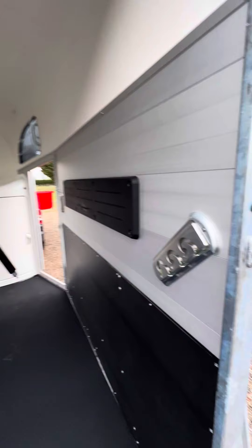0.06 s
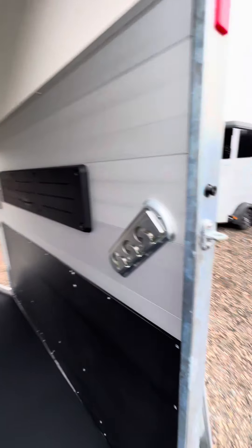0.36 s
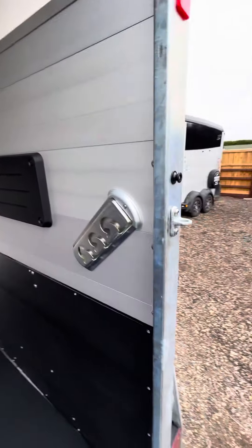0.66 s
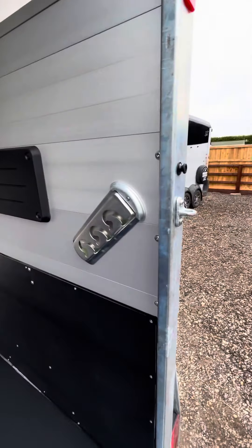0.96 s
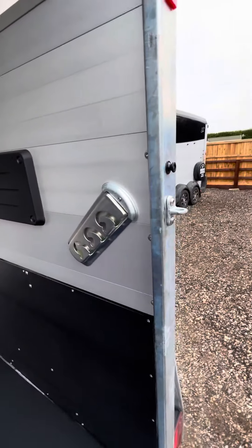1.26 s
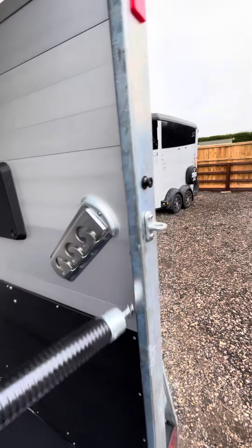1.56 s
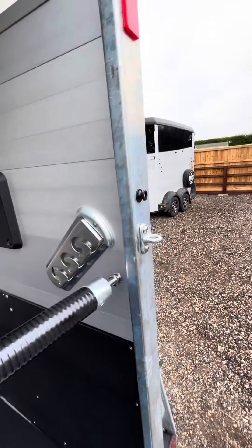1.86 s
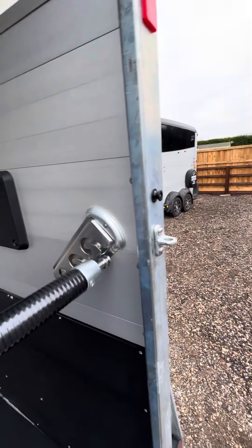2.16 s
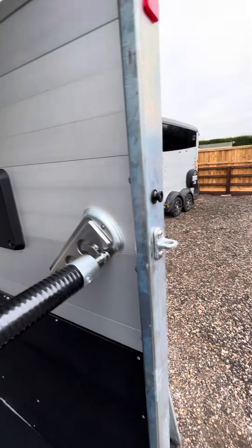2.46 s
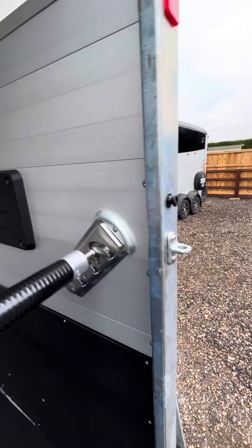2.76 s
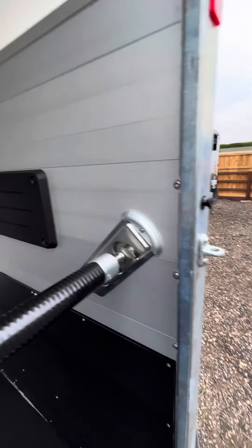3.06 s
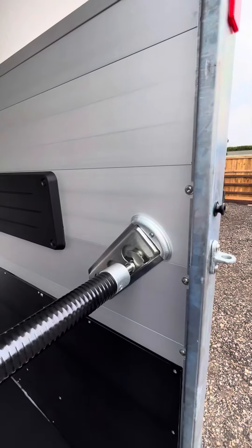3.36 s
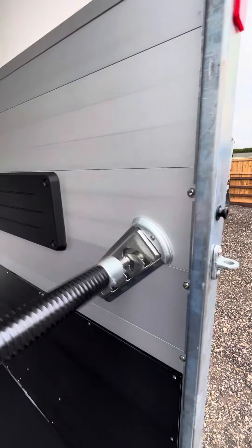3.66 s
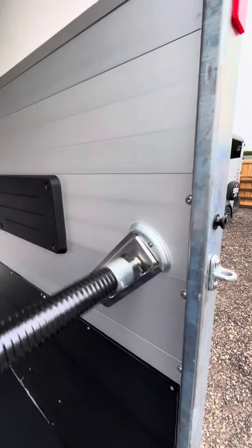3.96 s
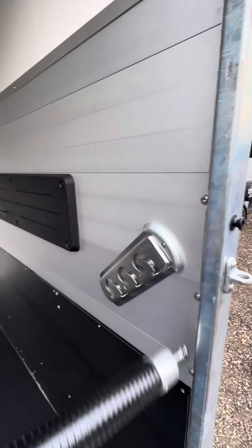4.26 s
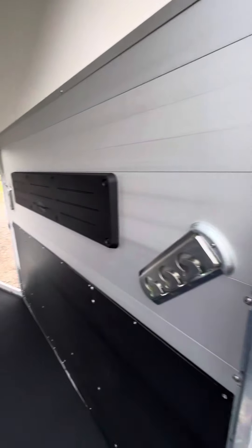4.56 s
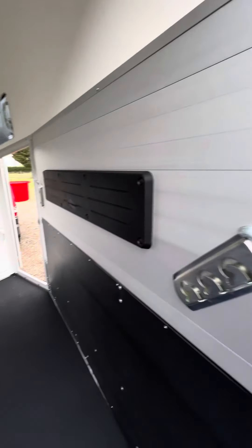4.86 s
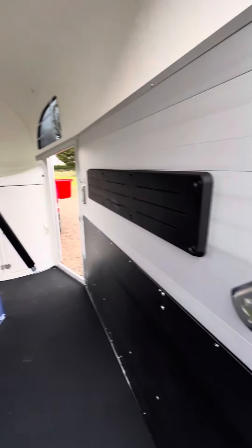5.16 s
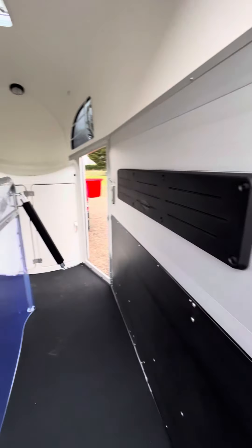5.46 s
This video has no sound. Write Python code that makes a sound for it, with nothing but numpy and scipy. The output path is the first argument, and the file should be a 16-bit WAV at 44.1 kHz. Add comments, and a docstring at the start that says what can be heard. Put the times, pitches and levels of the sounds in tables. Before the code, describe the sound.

Faint rustles, a few soft knocks and small birds chirping sit over a low, steady outdoor drone. Then, close by inside a horse trailer, a bar's steel pin is knocked loudly into a wall bracket. It clanks repeatedly, grates and briefly squeals, each hit ringing the metal and booming in the hollow body while the floor rumbles. The clanks ease off, and one lighter knock comes at the end.

```python
"""In a horse trailer, the steel pin of a padded breech bar is knocked into the slotted wall bracket,
scraped along it and drawn out again. Each impact cracks, rings the bracket's modes, crosses the
aluminium panel as a bending wave and booms in the hollow body. Stick-slip friction makes the pin grate,
groan and squeal; the floor rumbles as weight shifts, amid faint rustles and hisses.
Outside the open ramp are a low steady drone, faint air and small birds."""
import sys
import numpy as np
from scipy import signal
from scipy.fft import rfft, irfft, next_fast_len
from scipy.io import wavfile

SR = 44100
rng = np.random.default_rng(int(sys.argv[2]) if len(sys.argv) > 2 else 0)


def digitize_waveform(pressure):
    """Quantize a signal to 16-bit integers and store it at the path in sys.argv[1].

    Rows of a 2-D input are taken as channels; values are limited to [-1, 1].
    """
    field = np.atleast_2d(pressure).T
    bounded = np.clip(field, -1, 1)
    quanta = np.round(bounded * 32767).astype(np.int16)
    wavfile.write(sys.argv[1], SR, quanta)


N = 242991
TIME = np.arange(N) / SR
BANDS_HZ = 28 * 2 ** (np.arange(28) / 3)   # third-octave centres


def from_db(db):
    """Decibels to amplitude ratio."""
    return 10 ** (np.asarray(db) / 20)

def unit_rms(x):
    """Normalisation to unit power."""
    return x / np.sqrt(np.mean(x ** 2) + 1e-20)

def at_hz(rows, hz, column=1):
    """Interpolation of a table column over log frequency."""
    rows = np.array(rows)
    return np.interp(np.log(hz + 1e-3), np.log(rows[:, 0]), rows[:, column])

def pan(db):
    """A level difference as left and right gains."""
    return from_db(np.array([[db], [-db]]) / 2)

def add(track, start, sound):
    """Superposition of a sound on a track, from a start in seconds."""
    at = int(start * SR)
    track[..., at:at + sound.shape[-1]] += sound[..., :N - at]

def wander(rate):
    """Random modulation: straight lines between `rate` Gaussian values a second."""
    return np.interp(TIME * rate, np.arange(12000), rng.standard_normal(12000))

def resonate(x, hz, width_hz):
    """Resonance: two second-order band-passes in cascade, each of this width."""
    r = np.exp(-np.pi * width_hz / SR)
    b, a = np.array([1, 0, -1]) * (1 - r * r) / 2, [1, -2 * r * np.cos(2 * np.pi * hz / SR), r * r]
    once = signal.lfilter(b, a, x + 1e-18)
    return signal.lfilter(b, a, once + 1e-18)

def swells(rows, attack_s, t60, column=2):
    """Envelopes that rise, hold and decay exponentially, summed in power."""
    power = np.zeros(N)
    for row in rows:
        age = TIME - row[0]
        decay_db = 60 * np.maximum(age - row[1], 0) / t60
        power += (np.clip(age / attack_s, 0, 1) * from_db(row[column] - decay_db)) ** 2
    return np.sqrt(power)

def echoes(x, t60):
    """Diffuse reverberation: convolution with decaying stereo noise."""
    tail = rng.standard_normal((2, SR // 2)) * from_db(-60 * TIME[:SR // 2] / t60)
    return signal.fftconvolve(x[None], tail / np.linalg.norm(tail[0]), axes=1)[:, :N]

def coloured(bands, spectrum, shift_s):
    """Spectral shaping of band noise; a time shift decorrelates it from other uses."""
    mix = sum(float(from_db(at_hz(spectrum, hz))) * noise
              for hz, noise in zip(BANDS_HZ, bands) if hz < 2 * spectrum[-1][0])
    return np.roll(mix, int(shift_s * SR), axis=1)

# The stereo field: (frequency [Hz], left over right [dB], coherence [0-1], left phase lead [rad])
STEREO = [(100, 3, 1, 0.25), (310, 4.5, 0.95, -0.36), (567, 13.5, 0.072, 0.5), (1000, 9, 0.15, 0.03),
          (1896, 1.5, 0.88, -1.43), (4300, 1.5, 0.042, -3), (9040, 0.5, 0.29, -0.8)]
def stereo_gain(hz):
    """Level and phase differences as complex left and right gains."""
    phase = at_hz(STEREO, hz, column=3) * np.array([[0], [1]])
    return pan(at_hz(STEREO, hz)).reshape(2, -1) * np.exp(-1j * phase)

def noise_bands(pan_share, ripple_db, spacing_hz, clusters=()):
    """Partly coherent stereo noise in bands; overlapping resonances ripple its spectrum."""
    size = next_fast_len(N)
    hz = np.arange(size // 2 + 1) * SR / size
    left, other = rfft(rng.standard_normal((2, size)))
    coherence = np.clip(at_hz(STEREO, hz, column=2), 0, .999)
    right = coherence * left + np.sqrt(1 - coherence ** 2) * other
    right *= np.exp(-1j * at_hz(STEREO, hz, column=3))
    ripple = np.interp(hz / spacing_hz, np.arange(len(hz)), rng.standard_normal(len(hz)))
    ripple *= hz / (hz + 900) / (1 + (hz / 9000) ** 2)
    humps_db = sum(db * np.exp(-((hz - centre) / width) ** 2) for centre, width, db in clusters)
    pair = np.array([left, right]) * from_db(ripple_db * ripple + humps_db)
    band_index = np.interp(hz, BANDS_HZ, np.arange(len(BANDS_HZ)))
    bands, overlap_gain = [], np.sqrt(2 / 3)
    for k, centre in enumerate(BANDS_HZ):
        triangle = np.maximum(1 - abs(band_index - k), 0)
        band = unit_rms(irfft(pair * triangle, size)[:, :N])
        bands.append(band * overlap_gain * pan(pan_share * at_hz(STEREO, centre)))
    return bands


# Spectrum of the outdoor air: (frequency [Hz], band level [dB])
AIR_SPECTRUM = [(25, -74.5), (45, -57.5), (75, -56.5), (110, -56), (160, -60.5), (250, -66.5), (450, -64),
                (800, -58.5), (1300, -64.5), (2200, -69), (3500, -74), (5700, -76), (6700, -77.5),
                (8300, -73.5), (10500, -98.5), (15000, -112)]
def air(bands):
    """Stationary broadband noise: the faint air outside."""
    return coloured(bands, AIR_SPECTRUM, shift_s=0)

def drone(hz=72.3, width_hz=16, db=-46.5):
    """Narrowband noise beats within itself: a low, wavering hum from far away."""
    hum = resonate(rng.standard_normal(N + SR), hz, width_hz)[SR:]
    return from_db(db) * unit_rms(hum) * pan(at_hz(STEREO, hz))

# Faint hisses: (time [s], duration [s], centre frequency [Hz], level [dB])
HISSES = [(0.224, 0.065, 8070, -61.5), (0.41, 0.52, 3660, -61.5), (0.477, 0.55, 6000, -64),
          (1.206, 0.22, 8070, -58.5), (4.3, 1.4, 5580, -71), (4.242, 1.14, 8140, -69.5)]
def hiss(width_hz=850):
    """Band-passed white noise swells and fades as soft, narrow hisses."""
    out, white = np.zeros((2, N)), rng.standard_normal((2, N))
    for row in HISSES:
        noise = unit_rms(resonate(white, row[2], width_hz))
        out += swells([row], attack_s=0.035, t60=0.86, column=3) * noise
    return out

# Arched whistles: (time [s], pitch [Hz], glide [share of pitch], level [dB])
BIRD_WHISTLES = [(.34, 6350, .07, -58.5), (1.01, 4800, -0.027, -58.5), (1.155, 6360, 0.02, -49.5),
                 (1.645, 5170, -0.029, -57), (1.82, 5700, -.025, -59)]
# Falling sweeps: (time [s], middle pitch [Hz], level [dB])
BIRD_SWEEPS = [(.135, 4930, -56), (.475, 4950, -57), (1.9, 5200, -62), (2.018, 4970, -66),
               (2.09, 5450, -57)]
def birds(whistle_s=0.105, whistle_arch=0.035, sweep_s=0.053, sweep_glide=-0.56, warble=0.0085):
    """Frequency- and amplitude-modulated tones: birdsong, blurred by echoes from the yard."""
    song = np.zeros(N)
    notes = [(start, whistle_s, hz, glide, whistle_arch, db) for start, hz, glide, db in BIRD_WHISTLES]
    notes += [(start, sweep_s, hz, sweep_glide, 0, db) for start, hz, db in BIRD_SWEEPS]
    for start, length, middle_hz, glide, arch, db in notes:
        progress = np.linspace(0, 1, int(length * SR))
        waver = np.interp(progress, np.linspace(0, 1, 40), rng.standard_normal(40))
        hz = middle_hz * (1 + glide * (progress - .5) - arch * (2 * progress - 1) ** 2 + warble * waver)
        tone = np.sin(2 * np.pi * np.cumsum(hz) / SR)
        add(song, start, from_db(db) * np.sin(np.pi * progress) * tone)
    song *= from_db(3 * wander(120))   # flutter
    return from_db(-5.5) * song + from_db(-8) * echoes(song, t60=0.23)

# Rustles of handling: (time [s], duration [s], level [dB])
HANDLING = [(-.05, 0.14, -52.5), (.2, 0.35, -56.5), (.48, 0.53, -57.5), (1.18, 0.25, -51),
            (4.17, 0.33, -60)]
# Their spectrum: (frequency [Hz], band level [dB])
RUSTLE_SPECTRUM = [(400, -16.5), (1500, -17.5), (2700, -16.5), (3700, -14), (5000, -10.5), (6500, -15),
                   (8200, -2), (10500, -54.5), (15000, -56)]
def rustle(bands):
    """Amplitude-modulated treble noise: faint rustles of handling."""
    return swells(HANDLING, attack_s=0.057, t60=1.2) * coloured(bands, RUSTLE_SPECTRUM, shift_s=1.8)

# Weight shifting on the floor: (time [s], duration [s], level [dB])
FLOOR_LOADS = [(.49, 0.026, -45.5), (.83, 0.18, -38.5), (1.25, 0.13, -35), (2.45, 0.45, -35),
               (3.25, 0.95, -39), (3.68, 0.82, -35.5)]
# The floor's response: (frequency [Hz], band level [dB])
FLOOR_SPECTRUM = [(28, -50), (50, -9), (75, -11), (150, -6), (230, -15.5), (350, -18), (500, -27.5),
                  (1200, -39.5), (3000, -79.5)]
def floor(bands, rest_db=-57):
    """Forced vibration: shifting weight lifts the floor's rumble above its resting level."""
    load = from_db(rest_db) + swells(FLOOR_LOADS, attack_s=0.038, t60=0.87)
    return load * coloured(bands, FLOOR_SPECTRUM, shift_s=2)

# Squeals of the pin:
# (time [s], duration [s], pitch [Hz], glide [share of pitch], roughness [0-1], level [dB])
PIN_SQUEALS = [(2.622, 0.055, 1200, -0.09, 0.45, -37), (2.622, 0.055, 6850, 0.05, 0.97, -41.5),
               (2.623, 0.06, 11500, -0.028, 0.9, -55.5), (2.71, 0.083, 3650, 0.13, 0.9, -43)]
def squeals(edge_s=0.0085, width_share=0.21):
    """Self-excited vibration: binding steel sings a gliding tone that roughness turns to a screech."""
    out = np.zeros((2, N))
    for start, length, hz, glide, rough, db in PIN_SQUEALS:
        t, rate = TIME[:int(length * SR)], width_share * hz
        cycles = np.cumsum(hz * (1 + glide * (t / length - .5))) / SR
        scatter = np.array([unit_rms(wander(rate)) + 1j * unit_rms(wander(rate)) for _ in range(2)])
        amplitude = np.sqrt(2 * (1 - rough ** 2)) + rough * scatter[:, :len(t)]
        tone = (amplitude * np.exp(2j * np.pi * cycles)).real
        fade = np.clip(np.minimum(t, length - t) / edge_s, 0, 1)
        add(out, start, from_db(db) * pan(at_hz(STEREO, hz)) * tone * fade)
    return from_db(-1) * out + from_db(-5) * echoes(out[0], t60=0.24)

# Strokes of the pin along the slot: (time [s], duration [s], grit level [dB], groan level [dB])
STROKES = [(2.617, 0.17, -46, -33.5), (3.026, 0.12, -57, -45.5), (3.547, 0.093, -50.5, -48),
           (3.885, 0.17, -46, -47.5)]
# Resonances of the sliding contact: (frequency before bending [Hz], width [Hz], level [dB])
GROAN_PEAKS = [(597, 50, -5.5), (1170, 100, 0.5), (1437, 50, 1.5), (1900, 280, 4.5), (2600, 200, -2),
               (3100, 150, -4.5), (3700, 470, -2)]
# Spectrum of the grit: (frequency [Hz], band level [dB])
GRIT_SPECTRUM = [(100, -22.5), (350, 1.5), (480, -2.5), (750, -2.5), (1500, -13), (3000, -22.5), (4500, -7),
                 (6000, -18), (7400, -5), (9500, -24), (11500, -18.5), (15500, -52.5)]
def scrape(bands, slips_per_s=1100, slip_s=0.0018, catches_per_s=70, start_ratio=0.89, sag_per_s=0.18):
    """Stick-slip friction: uneven jerks make grit and drive resonances that sag as the pin slows."""
    slips = (rng.random(N) < slips_per_s / SR) * from_db(-rng.standard_normal(N))
    slip_power = signal.lfilter([1], [1, -np.exp(-1 / (slip_s * SR))], slips ** 2 + 1e-18)
    patchy = [band * from_db(3.5 * wander(catches_per_s)) for band in bands]
    grit = unit_rms(np.sqrt(slip_power)) * coloured(patchy, GRIT_SPECTRUM, shift_s=1.0)
    jerks = slips * (rng.standard_normal(N) + rng.standard_normal((2, N)))
    bend, groan = np.ones(N), np.zeros((2, N))
    for start, length, *_ in STROKES:
        bend = np.where(TIME < start, bend, start_ratio - sag_per_s * np.minimum(TIME - start, length))
    for hz, width, db in GROAN_PEAKS:
        tone = unit_rms(resonate(jerks, hz, 2 * width))
        pitch_ratio = bend * (1 + 0.039 * wander(catches_per_s))
        read_at = np.cumsum(pitch_ratio) % (N - 1)
        bent = np.array([np.interp(read_at, np.arange(N), side) for side in tone])
        groan += from_db(db + wander(catches_per_s)) * pan(at_hz(STEREO, hz)) * bent
    grit_gain, groan_gain = (swells(STROKES, attack_s=0.029, t60=0.32, column=c) for c in (2, 3))
    return grit_gain * grit + groan_gain * unit_rms(groan)

# Steel striking bracket and wall: (time [s], force [dB], treble tilt [dB/octave], crack [dB],
# bracket ring [dB], bending wave [dB], favoured frequency [Hz])
STEEL_BLOWS = [(0.1307, -41.5, 0.5, 8, -1, 8, 4250), (0.716, -36, -19, 8.5, -0.5, 2, 1200),
               (1.55, -50, 1.5, 13, 0, -7, 6200), (2.1879, -7.5, -1, 9.5, 2.5, -2, 6300),
               (2.2, -5.5, -4, -15, 3.5, -15, 1060), (2.207, -13, 2.5, -3, -2, -6, 6400),
               (2.369, -17.5, -6.5, 4.5, 0, 6.5, 1800), (2.488, -23, -10, 7, 3.5, -0.5, 1850),
               (2.5256, -17.5, -14, 8.5, 0, 0.5, 1950), (2.548, -29.5, -4, 5, -6, 8, 1500),
               (2.582, -39.5, -5, 16, 5, 0, 7000), (2.685, -18, -7.5, 6, 1, -3, 3970),
               (2.758, -17, 1, -3, 4, -3, 3430), (3.0843, -3.5, -5.5, 12.5, 5, 1, 2910),
               (3.099, -9.5, -8, -5, 0.5, 1.5, 670), (3.11, -4, 1, 5.5, -10, -4, 6670),
               (3.6181, -5.5, 0.5, 11.5, 2, -3.5, 1180), (3.632, -1.5, -4.5, 5, 3, -14, 810),
               (3.67, -10.5, -15, -13, -0.5, 0, 335), (4.0789, -22, -7.5, 4, -7, 2, 2200),
               (5.4725, -25, -2, -1.5, -8, 3.5, 444), (5.487, -25.5, -2, -8, 0, 1, 905)]
# Soft, heavy bumps against the body: (time [s], force [dB])
SOFT_BLOWS = [(0.093, -25), (1.138, -19.5), (2.206, -8), (2.371, -7.5), (2.761, -4.5), (2.808, -15.5),
              (3.791, -11.5), (4.143, -13.5), (5.475, -15)]
def blows(hz, treble_hz=2370, soft_hz=361, favour_db=5.5, favour_octaves=0.31):
    """Contact shapes the force spectrum: (time [s], force [dB], crack [dB], ring [dB]) at hz."""
    treble_octaves = max(np.log2(hz / treble_hz), 0)
    hits = []
    for start, db, tilt, crack_db, ring_db, _, favoured_hz in STEEL_BLOWS:
        # a sharp edge tilts the treble up, a glancing touch down; the spot struck favours one range
        spot_db = favour_db * np.exp(-(np.log2(hz / favoured_hz) / favour_octaves) ** 2)
        hits.append((start, db + treble_octaves * tilt + spot_db, crack_db, ring_db))
    soft_loss_db = 16.5 * max(np.log2(hz / soft_hz), 0)   # soft contacts drive only the lows
    return hits + [(start, db - soft_loss_db, 13.5, 0.5) for start, db in SOFT_BLOWS]

# Spectrum of the panel's bending wave: (frequency [Hz], level [dB])
BENDING_SPECTRUM = [(50, -18), (130, -19.5), (400, -20.5), (800, -17), (2700, -26)]
def bending_wave(top_hz=2691.4, two_octaves_s=0.0125, rough_db=4.0):
    """Dispersion: highs cross the panel first, so each steel blow arrives as a falling thunk."""
    out, t = np.zeros((2, N)), TIME[:SR // 10]
    hz = top_hz / (1 + t / two_octaves_s) ** 2
    envelope = from_db(at_hz(BENDING_SPECTRUM, hz)) * (1 - t / t[-1])
    chirp = stereo_gain(hz) * envelope * np.exp(2j * np.pi * np.cumsum(hz) / SR)
    for (start, db, *_, wave_db, _), turn in zip(STEEL_BLOWS, rng.random(len(STEEL_BLOWS))):
        add(out, start, (from_db(db + wave_db) * chirp * np.exp(2j * np.pi * turn)).real)
    return out * from_db(rough_db * wander(300))

# Modes of the body (lowest four), bracket and bar: (frequency [Hz], level [dB], T60 [s])
MODES = [(75.1, -19.5, 1), (208.5, -22, 0.4), (349.5, -27, 0.35), (543, -32, 0.27), (585, -31, 0.3),
         (695, -27, 0.24), (768, -19.5, 0.191), (850, -21, 0.13), (890, -24.5, 0.13), (936, -30.5, 0.13),
         (1047, -17, 0.15), (1130, -17, 0.14), (1196, -23, 0.16), (1260, -23.5, 0.19), (1436, -24, 0.19),
         (1514, -29, 0.21), (1810, -25, 0.24), (1840, -34, 0.18), (2342, -30, 0.27), (2412, -26.5, 0.24),
         (2790, -29, 0.18), (3100, -34.5, 0.18), (4200, -20, 0.078), (5170, -16.5, 0.036),
         (6840, -12, 0.04)]
def bracket_ring(modes_db=-4.0, spread_db=2.5, build_cycles=6):
    """Damped free vibration: each blow rings the same modes with its own strengths and phases."""
    out, t = np.zeros((2, N)), TIME[:SR // 2]
    for hz, db, t60 in MODES:
        envelope = from_db(db + modes_db - 60 * t / t60) * (1 - np.exp(-t * hz / build_cycles))
        ring = stereo_gain(hz) * envelope * np.exp(2j * np.pi * hz * t)
        for start, force_db, _, ring_db in blows(hz):
            size, turn = rng.standard_normal(2)
            gain = from_db(force_db + ring_db + spread_db * size)
            add(out, start, (gain * ring * np.exp(2j * np.pi * turn)).real)
    return out

# The first crack of steel on steel: (frequency [Hz], band level [dB])
CRACK_SPECTRUM = [(60, -62), (350, -39), (700, -26.5), (1100, -23.5), (1900, -15.5), (4000, -17),
                  (7000, -16.5), (10500, -24), (15000, -22.5)]
# The wall panel and the space behind it: (frequency [Hz], band level [dB], T60 [s])
PANEL = [(30.35, -58.5, 0.57), (49, -38.5, 0.81), (67.4, -25, 0.87), (90.8, -29.5, 0.56),
         (123.8, -25.5, 0.85), (218, -20.5, 0.54), (272, -26, 0.5), (422, -25.5, 0.13), (651, -23, 0.29),
         (1043, -24, 0.23), (2500, -25, 0.29), (3350, -28.5, 0.32), (4410, -23.5, 0.29), (7110, -25, 0.29),
         (11200, -35, 0.25), (15500, -47, 0.2)]
def knocks(bands, travel_s=0.0018, contact_s=0.0015, crack_t60=0.017, echo_s=0.023,
           tail_db=-18.0, tail_t60=0.83, dull_hz=10000, rattles_per_s=140):
    """Impulse response: a crack, then the panel's dense modes build up, rattle and reverberate."""
    out, t = np.zeros((2, N)), TIME[:SR * 5 // 4]
    reflected = from_db(np.interp(t, [echo_s / 2, echo_s], [-5, 0]))   # the far wall's echo returns
    shared_rattle_db = -0.13 * wander(rattles_per_s)   # loose fittings shake the ring
    for hz, noise in zip(BANDS_HZ, bands):
        slowness = np.sqrt(1000 / hz)   # of bending waves, relative to 1 kHz
        age = np.maximum(t - travel_s * slowness, 0)
        early = age[:SR // 10]
        crack = from_db(at_hz(CRACK_SPECTRUM, hz) - 60 * early / (crack_t60 * np.sqrt(slowness)))
        crack *= 2 * (1 - np.exp(-early / contact_s))
        build_s = 0.0011 + 0.00155 * slowness
        swell = reflected * (1 - np.exp(-age / build_s))
        decay = from_db(-60 * age / at_hz(PANEL, hz, column=2))
        tail = from_db(tail_db - 60 * age / tail_t60 * (1 + (hz / dull_hz) ** 4))
        panel_power = (from_db(at_hz(PANEL, hz)) * swell) ** 2 * (decay ** 2 + tail ** 2)
        ring_power, crack_power = np.zeros((2, N))
        for start, force_db, crack_db, _ in blows(hz):
            add(ring_power, start, from_db(force_db) ** 2 * panel_power)
            add(crack_power, start, (from_db(force_db + crack_db) * crack) ** 2)
        rattle_db = shared_rattle_db + 1.46 * wander(rattles_per_s)
        shake = from_db(rattle_db * min(1 / slowness, 1))   # the lows stay steadier
        out += np.sqrt(ring_power * shake ** 2 + crack_power) * noise
    return out

# Where the panel's modes crowd or thin out: (frequency [Hz], width [Hz], gain [dB])
MODE_CLUSTERS = [(1130, 130, 7), (1858, 110, 9.5), (2400, 98, 0.5), (5750, 93, -4), (7610, 600, 4.5)]
def scene():
    """Superposition of the bar and trailer close by and the yard beyond."""
    near = noise_bands(pan_share=0.71, ripple_db=6.0, spacing_hz=43.78, clusters=MODE_CLUSTERS)
    far = noise_bands(pan_share=0.29, ripple_db=2.5, spacing_hz=110)
    bar = knocks(near) + bending_wave() + bracket_ring() + scrape(near) + squeals()
    return air(far) + drone() + birds() + hiss() + rustle(far) + floor(near) + bar

def record(dry, cutoff_hz=15900):
    """Soft saturation rounds the highest peaks; a steep low-pass cuts the top."""
    lowpass = signal.ellip(10, .2, 80, cutoff_hz, fs=SR, output="sos")
    return signal.sosfilt(lowpass, np.tanh(dry))


dry = scene()
out = record(dry)
digitize_waveform(out)
```